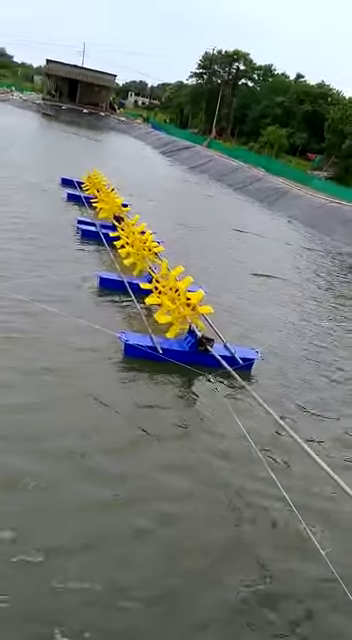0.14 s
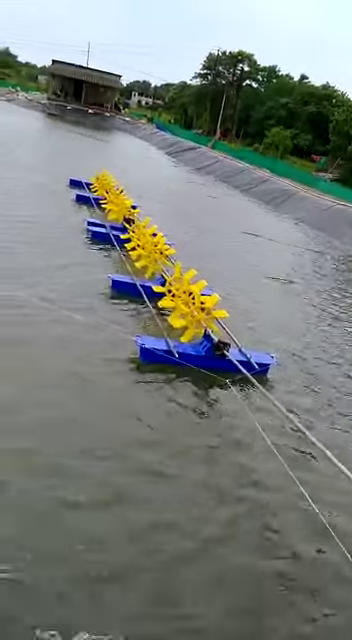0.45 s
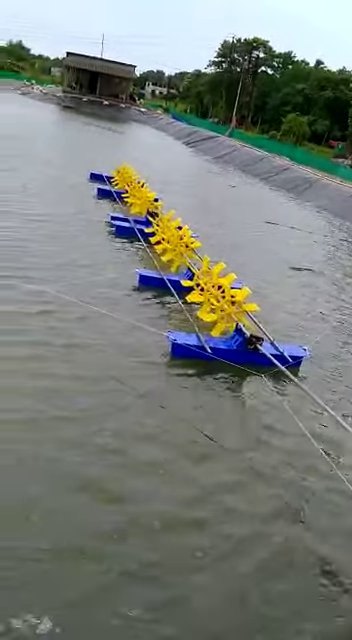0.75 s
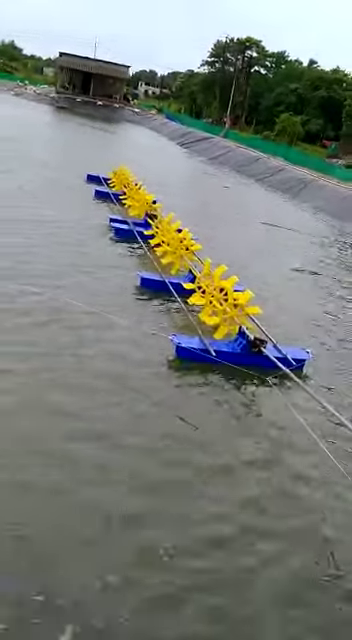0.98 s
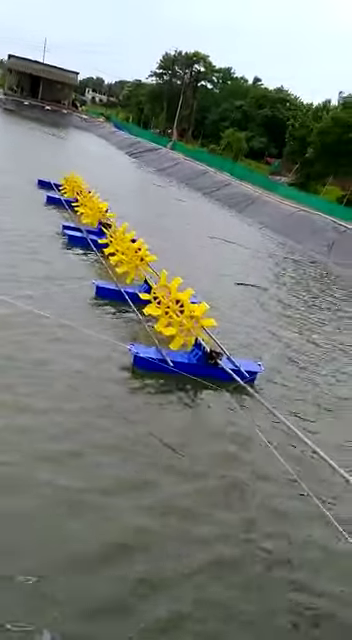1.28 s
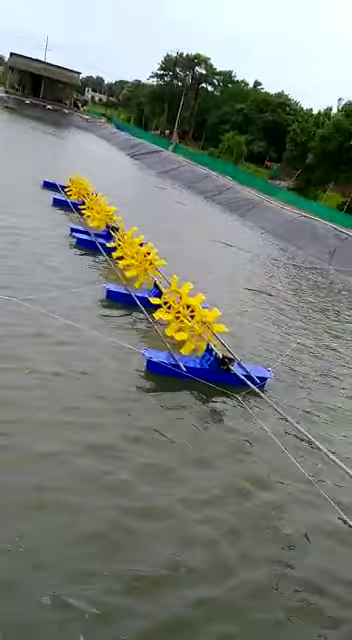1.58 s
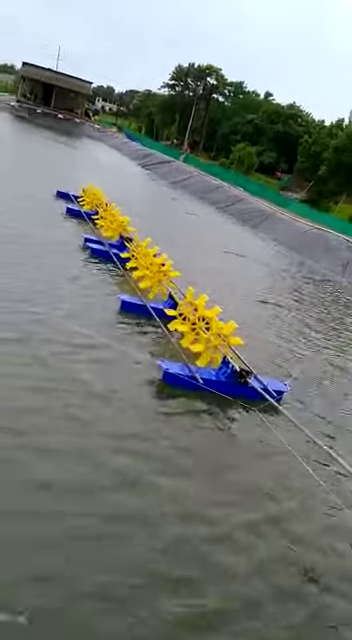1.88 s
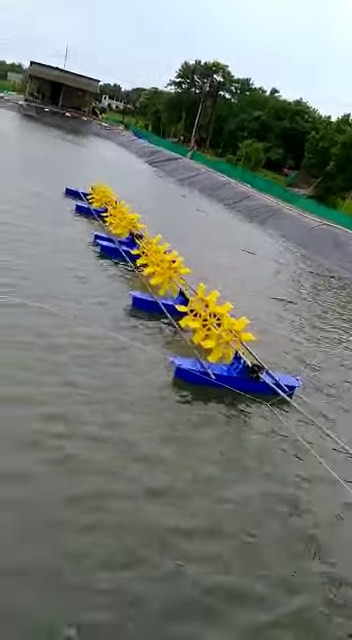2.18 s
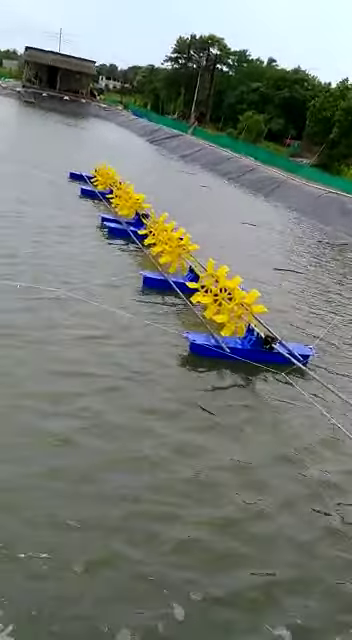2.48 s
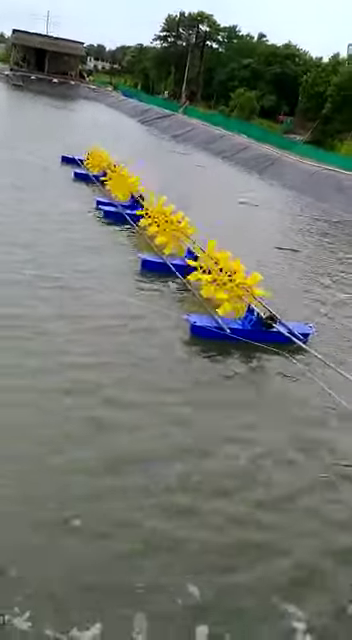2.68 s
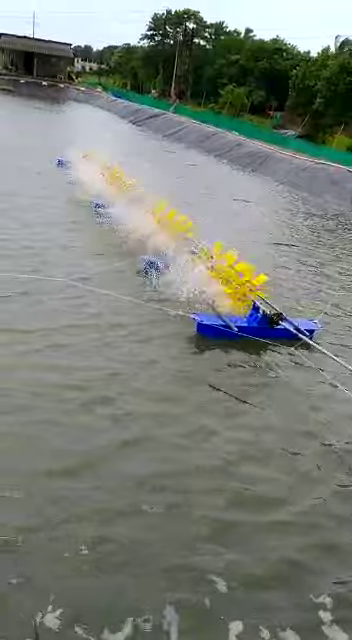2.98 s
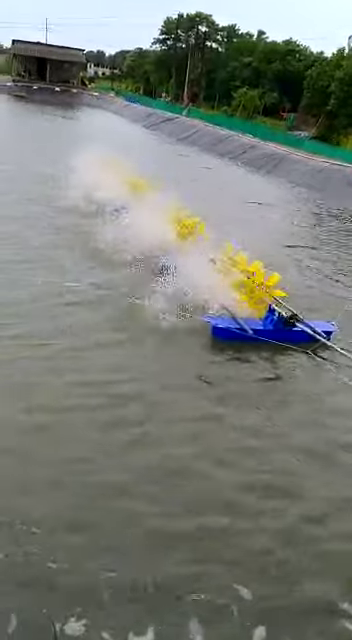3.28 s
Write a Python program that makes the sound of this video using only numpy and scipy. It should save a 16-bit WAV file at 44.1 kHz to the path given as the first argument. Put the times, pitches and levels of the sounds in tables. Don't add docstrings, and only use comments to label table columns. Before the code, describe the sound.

A row of chain-driven paddlewheels starts on an outdoor pond. From 0 to 2.6 seconds, faint rapid idle knocks, soft water hiss and tiny drips sit beneath uneven wind thumps; a thin falling bird whistle sounds at the start and near 1.6. Then irregular metallic chain strikes, ringing gear mesh and spray burst in, strongest around 2.8-3.0, easing as crackling wind slaps dominate from 3.05 to the end.

```python
import sys
import numpy as np
from scipy import signal
from scipy.io import wavfile
from scipy.ndimage import uniform_filter1d, minimum_filter1d

SR = 44100
rng = np.random.default_rng(int(sys.argv[2]) if len(sys.argv) > 2 else 0)


def materialize(psi):
    bounded = np.clip(np.atleast_2d(psi).T, -1, 1)
    quanta = np.round(bounded * 32767).astype(np.int16)
    wavfile.write(sys.argv[1], SR, quanta)


def convert_level_to_amplitude(level_db):
    exponent = np.asarray(level_db, float) / 20
    return 10 ** exponent


N = 152145
CLUTCH_S = 2.6


def rms_one(x):
    return x / np.sqrt(np.mean(x ** 2) + 1e-20)


def in_time(rows):
    return np.interp(np.arange(N) / SR, *np.transpose(rows))


def at_hz(points, hz):
    table_hz, value = np.transpose(points)
    return np.interp(np.log(hz), np.log(table_hz), value)


def drift(rate_hz):
    r = np.exp(-40 * np.pi * rate_hz / SR)
    noise = rng.standard_normal(N // 20 + 2002)
    slow = signal.lfilter([1], [1, -2 * r, r * r], noise)[2000:]
    return np.interp(np.arange(N) / 20, np.arange(len(slow)), rms_one(slow))


def clicks(s, gain):
    out = np.full(N, 1e-18)
    i = (np.asarray(s) * SR).astype(int)
    np.add.at(out, i[i < N], np.asarray(gain)[i < N])
    return out


def random_clicks(shape, per_s, spread_db, most):
    hit = rng.random(shape) < per_s / SR
    return hit * convert_level_to_amplitude(spread_db * np.minimum(rng.exponential(1, shape), most))


def fade(x, t60_s):
    return signal.lfilter([1], [1, -convert_level_to_amplitude(-60 / (t60_s * SR))], x)


def ring(x, hz, t60_s):
    r, w = convert_level_to_amplitude(-60 / (t60_s * SR)), 2 * np.pi * hz / SR
    return signal.lfilter([0, np.sin(w)], [1, -2 * r * np.cos(w), r * r], x)


def bandpass(x, low_hz, high_hz):
    return signal.sosfilt(signal.butter(2, [low_hz, high_hz], "band", fs=SR, output="sos"), x)


def bands(sources, low_hz, high_hz, count, gain_db):
    edges, out = np.geomspace(low_hz, high_hz, count + 1), 0
    for k in range(count):
        centre_hz = np.sqrt(edges[k] * edges[k + 1])
        gain = convert_level_to_amplitude(gain_db(centre_hz))
        out = out + gain * bandpass(sources[k % len(sources)], edges[k], edges[k + 1])
    return out


# (frequency [Hz], level [dB per Hz])
POND_COLOUR = [(600, 0), (1900, 1.5), (2700, -3), (3600, -14.5), (4800, -14.5), (7800, -14), (10800, -19.5),
               (15500, -14.5)]
# (time [s], level [dB])
LAPPING_SWELL = [(0, 0.5), (0.599, -4.5), (.75, 2.5), (.88, -1.5), (1.099, -3.5), (1.481, 3), (1.521, -3.5),
                 (2.238, -3.5), (2.289, 12.5), (2.35, -1.5), (2.6, 2)]
# (time [s], peak [dB], pitch [Hz])
DRIP_EVENTS = [(0.383, -51.5, 6040), (.55, -70, 6240), (0.8899, -54, 7800), (1.1578, -46, 8200),
               (1.292, -47, 7650), (1.3443, -48, 6750), (1.3798, -55, 6080), (1.4735, -53, 6500),
               (1.698, -39, 15400), (1.8826, -52, 5280), (1.888, -50, 14800), (1.9335, -51, 5840),
               (1.936, -47, 14000), (1.961, -39, 15100), (1.96, -48, 5560), (2.2149, -50, 7700),
               (2.2757, -44, 15400), (2.3343, -43, 5550), (2.5052, -54, 8010), (2.5346, -45, 13900)]


def pond():
    swell = in_time(LAPPING_SWELL) - np.mean(np.transpose(LAPPING_SWELL)[1])
    patches = 2 * np.tanh(drift(31.0) / 2)

    def gain_db(hz):
        lapping = swell * np.clip(hz / 5000, 0, 1)
        return at_hz(POND_COLOUR, hz) + lapping + 2.6 * patches + 0.5 * drift(27.0)

    hiss = bands(rng.standard_normal((2, N)), 478, 17300, 20, gain_db)
    drips = sum(ring(clicks([s], [convert_level_to_amplitude(db)]), hz, t60_s=0.0072) for s, db, hz in DRIP_EVENTS)
    return convert_level_to_amplitude(-56.5) * rms_one(hiss) + drips


# (start [s], length [s], level [dB])
BIRD_CALLS = [
    (-.03, 0.2, -59),
    (1.575, 0.19, -57.5),
]


def bird():
    out = 0
    for start_s, length_s, db in BIRD_CALLS:
        u = np.clip((np.arange(N) / SR - start_s) / length_s, 0, 1)
        hz = 2150 - 330 * u ** 2.2 + 40 * drift(53.0)
        breath = 1 + 0.4 * drift(120.0)
        envelope = np.sqrt(np.sin(np.pi * u) + 1e-9) * (u > 0) * (u < 1)
        out = out + convert_level_to_amplitude(db + 2.5) * breath * envelope * np.sin(2 * np.pi * np.cumsum(hz) / SR)
    return out


# (frequency [Hz], level [dB], t60 [s])
IDLE_MODES = [(1180, 1, 0.012), (1490, 6.5, 0.0078), (2050, 0.5, 0.014), (2500, -34.5, .012)]
# (time [s], level [dB])
KNOCK_CARRY = [(0, -14.5), (1.5, -0.5), (1.65, 4), (1.93, -1.5), (2.0, -5.5), (3.45, -5)]


def idle():
    first_s, period_s, level_db, weak_db = 0.087, 0.0912, -45, -19
    k = np.arange(56)
    weak = k % 2
    s = first_s + period_s * (k / 2 - 0.04 * weak)
    carry_db = np.interp(s, *np.transpose(KNOCK_CARRY))
    knock_db = level_db + weak_db * weak + carry_db
    knocks = 0
    for hz, db, t60_s in IDLE_MODES:
        chance_db = rng.normal(0, 3, len(k))
        knocks = knocks + ring(clicks(s, convert_level_to_amplitude(knock_db + db + chance_db)), hz, t60_s)
    return signal.sosfilt(signal.butter(4, 3000, fs=SR, output="sos"), knocks)


# (time [s], level [dB])
GUST_STRENGTH = [(0, -12), (.09, -25), (0.199, -18), (1.199, -18), (1.301, -47), (1.5, -17.5),
                 (1.622, -43.5), (1.898, -34.5), (1.992, -56.5), (2.06, -25), (2.13, -22), (2.18, -62),
                 (2.359, -23), (2.499, -9.5), (2.689, -18), (2.768, -39.5), (2.868, -21), (3.45, -17)]
# (time [s], tilt [dB per octave])
PORT_FACING = [(0, -2), (.6, 1), (.9, 1.5), (1.3, -1), (1.8, 1), (2.1, 0.5), (2.4, 0), (2.75, 1), (3.05, 0),
               (3.15, 5.5), (3.45, 4.5)]
# (time [s], peak [dB], crack [dB])
PORT_SLAPS = [(0.029, -20, -58), (0.064, -26.5, -67), (0.173, -24, -55), (0.193, -12.5, -45),
              (0.241, -10, -52), (0.281, -23, -52), (0.318, -16, -61), (0.374, -29.5, -59),
              (0.398, -29, -48), (0.42, -17, -48), (0.486, -7.5, -40), (0.511, -24.5, -49.5),
              (0.599, -21, -50), (0.66, -18.5, -51), (0.693, -11.5, -44), (0.729, -17, -46.5),
              (0.759, -11, -38), (0.809, -11, -47), (0.842, -8, -48), (0.865, -6.5, -31), (0.892, -17, -42),
              (0.913, -23, -55), (0.981, -15.5, -43), (1.021, -17, -53), (1.062, -25.5, -52),
              (1.088, -22, -51), (1.18, -9.5, -54), (1.385, -23, -62), (1.41, -26.5, -52),
              (1.463, -17.5, -48), (1.505, -13.5, -43), (2.058, -28.5, -74), (2.074, -25, -68),
              (2.101, -18, -47), (2.124, -17, -55), (2.359, -31, -58), (2.388, -22, -48.5),
              (2.436, -20, -57), (2.492, -21.5, -57), (2.554, -23.5, -58), (2.602, -15, -59),
              (2.628, -11.5, -52), (2.679, -20, -50), (2.852, -28.5, -34), (2.948, -18.5, -47),
              (3.017, -9.5, -45), (3.059, -5.5, -33), (3.072, -19, -71), (3.11, -15.5, -41),
              (3.131, -6.5, -39), (3.151, -16, -37), (3.178, -5.5, -36), (3.215, -13.5, -23),
              (3.237, -18.5, -25.5), (3.311, -13, -32), (3.344, -13, -32), (3.373, -12, -34),
              (3.399, -14, -26), (3.424, -9.5, -48)]


def wind_swing():
    rise_s, fall_s, slap_db = 0.008, 0.0092, 11
    s, db, _ = np.transpose(PORT_SLAPS)
    gust_excess = 0.5 * (np.interp(s, *np.transpose(GUST_STRENGTH)) + 19)
    over = db - np.mean(db) - gust_excess
    strength = np.clip(1 + 0.88 * over / slap_db, 0, 3)
    fall = fade(clicks(s, strength), fall_s * np.log(1000))
    slap = uniform_filter1d(fall, size=int(rise_s * SR), origin=int(rise_s * SR / 4))
    gust = in_time(GUST_STRENGTH) - np.max(np.transpose(GUST_STRENGTH)[1])
    lumps, flutter = 0.5 * drift(60.0), 4 * drift(83.0)
    return gust, in_time(PORT_FACING), slap_db * slap + lumps + flutter


# (frequency [Hz], level [dB per Hz])
WIND_COLOUR = [(12, -36), (20, 5.5), (147, 3), (173, 2.5), (354, -5), (947, -19.5), (1030, -29.5),
               (2590, -54), (3000, -17.5), (3900, -48), (6600, -120)]
# (frequency [Hz], share [dB per dB])
GUST_SHARE = [(25, 0.16), (100, 0.4), (300, 0.62), (1000, 1.31), (3000, 5.2)]
# (frequency [Hz], share [dB per dB])
FLICKER_SHARE = [(25, 0.018), (100, 0.66), (300, 0.46), (1000, 0.93), (3000, 0.82)]


def turbulence(gust, tilt, fast):
    def gain_db(hz):
        swing = at_hz(GUST_SHARE, hz) * gust + at_hz(FLICKER_SHARE, hz) * fast
        tilted = tilt * np.clip(np.log2(hz / 200), -2, 2.5)
        return at_hz(WIND_COLOUR, hz) + swing + tilted + 1.6 * drift(18.0)

    return convert_level_to_amplitude(-19) * rms_one(bands(rng.standard_normal((2, N)), 18.28, 3080, 16, gain_db))


def eddy_thuds(gust, tilt, fast):
    centre_hz = 501
    born = random_clicks(N, per_s=180, spread_db=9.8, most=3)
    thuds = bandpass(born + 1e-18, centre_hz * 0.63, centre_hz * 1.247)
    return convert_level_to_amplitude(-34.5 + 0.85 * gust + 1.65 * tilt + 0.25 * fast) * rms_one(thuds)


def slap_pops():
    s, db, _ = np.transpose(PORT_SLAPS)
    later_s = np.cumsum(rng.uniform(0.003, 0.007, (len(s), 3)), axis=1) - 0.004
    pop_db = db[:, None] + 1.5 - 3.3 * np.arange(3)
    burst = clicks((s[:, None] + later_s).ravel(), convert_level_to_amplitude(pop_db).ravel())
    puffs = fade(burst, 0.008) * (1 + 0.44 * drift(780.0))
    return bandpass(puffs, 250, 1110)


def slap_cracks():
    s, _, crack_db = np.transpose(PORT_SLAPS)
    snaps = fade(clicks(s + 0.0014, convert_level_to_amplitude(crack_db + 24)), 0.0015)
    return bandpass(snaps * (1 + 0.25 * rng.standard_normal(N)), 700, 4000)


def wind():
    swing = wind_swing()
    x = turbulence(*swing)
    cracks = slap_cracks()
    pressure = x + x * x + slap_pops() + eddy_thuds(*swing)
    lean = signal.lfilter([1, -1], [1, -np.exp(-2 * np.pi * 8.0 / SR)], pressure)
    port = signal.butter(4, 2330, fs=SR, output="sos")
    return signal.sosfilt(port, lean + cracks) + 0.034 * cracks


# (time [s], level [dB])
SPRAY_LEVEL = [(2.6, -53), (2.63, -57.5), (2.8, -54.5), (3.0, -56), (3.2, -58), (3.45, -56.5)]
# (frequency [Hz], level [dB per Hz])
SPRAY_COLOUR = [(900, 0.5), (1400, 4.5), (2600, -11), (4000, -11), (5000, -23), (6000, -18), (11000, -29),
                (15900, -46)]


def spray():
    drops = random_clicks((2, N), per_s=2500, spread_db=4.6, most=4) * rng.choice([-1, 1], (2, N))
    drops = drops * (np.arange(N) > CLUTCH_S * SR)
    patter = bands(drops + 1e-18, 1063, 16100, 20, lambda hz: at_hz(SPRAY_COLOUR, hz) + 1.1 * drift(10.0))
    return convert_level_to_amplitude(in_time(SPRAY_LEVEL) + 9) * rms_one(patter)


# (time [s], peak [dB])
CHAIN_TEETH = [(2.6043, -47), (2.6218, -31), (2.6402, -30), (2.6692, -22), (2.6851, -19), (2.7181, -31),
               (2.7505, -28), (2.7954, -18), (2.8089, -18.5), (2.8258, -18), (2.8398, -18), (2.8543, -14),
               (2.8702, -21.5), (2.8842, -14), (2.9141, -17.5), (2.9276, -16), (2.9555, -12.5),
               (2.9705, -16), (2.9999, -18.5), (3.0403, -25), (3.0533, -23.5), (3.0822, -29), (3.1097, -26),
               (3.1256, -19.5), (3.1531, -29.5), (3.168, -26.5), (3.1965, -39), (3.2109, -36),
               (3.2249, -44.5), (3.2553, -40), (3.2693, -42), (3.2833, -33), (3.2982, -21), (3.3267, -34),
               (3.3421, -38), (3.3561, -32), (3.3711, -29), (3.386, -28.5), (3.414, -30),
               (2.703, -26.5), (2.7319, -23.5), (2.7644, -21.5), (2.7795, -25.5), (2.8974, -18),
                (2.9404, -20), (2.9855, -18), (3.0144, -29), (3.0258, -36), (3.0666, -29), (3.095, -28),
                (3.1403, -33), (3.1814, -34.5), (3.2394, -33), (3.3114, -37), (3.3986, -24.5),
                (3.4296, -31), (3.4429, -27)]
# (frequency [Hz], level [dB])
HOUSING_MODES = [(1507, -6.5), (1584, 6.5), (1650, 8), (1730, 10.5), (1900, 8.5), (2085, 7.5), (2320, 5.5),
                 (2595, 6), (2950, -48)]
# (time [s], level [dB])
GEAR_LOAD = [(2.597, -91), (2.603, -34), (2.71, -38.5), (2.73, -37), (2.79, -36.5), (2.83, -29),
             (3.01, -34), (3.05, -40), (3.45, -39)]
# (time [s], level [dB])
LOW_SHELL = [(2.6, -20), (2.715, -24), (2.73, 1), (3.01, -2.5), (3.04, -13), (3.45, 2.5)]


def housing(tooth_s):
    beat = 1 + 1.66 * fade(clicks(tooth_s, np.ones(len(tooth_s))), 0.012)
    mesh = random_clicks(N, per_s=2500, spread_db=3.0, most=3) * rng.choice([-1, 1], N) * beat
    low_shell_db = in_time(LOW_SHELL)
    body = 0
    for hz, db in HOUSING_MODES:
        mode_db = db + 7.5 * np.tanh(drift(23)) + low_shell_db * (hz < 1800)
        body = body + convert_level_to_amplitude(mode_db) * ring(mesh + 1e-18, hz, t60_s=0.035)
    body = rms_one(body[int(CLUTCH_S * SR):])
    body = signal.sosfilt(signal.butter(3, 1300, "high", fs=SR, output="sos"), body)
    return convert_level_to_amplitude(in_time(GEAR_LOAD)) * np.concatenate([np.zeros(N - len(body)), body])


# (frequency [Hz], level [dB per Hz])
RATTLE_COLOUR = [(1760, -35), (3000, -17), (4500, -24), (5860, -9.5), (7230, -18.5), (8310, -9),
                 (10500, -17), (13500, -9.5), (15900, -3.5)]
# (frequency [Hz], level [dB])
LINK_MODES = [(4000, -23), (5950, -28), (8200, -17.5), (8800, -15), (12600, -8.5), (13550, -5.5),
              (14500, -14), (15300, -9.5)]


def chain(hits):
    shape = fade(hits, 0.012) + convert_level_to_amplitude(-9) * fade(hits, 0.092)
    rattle = bands(shape * rng.standard_normal((2, N)), 2620, 16250, 18,
                   lambda hz: at_hz(RATTLE_COLOUR, hz) + 2.35 * drift(30.0))
    touch = fade(hits, 0.0018) * rng.choice([-1, 1], N)
    links = sum(ring(touch * convert_level_to_amplitude(db - 16 + 3.4 * drift(44.0)), hz, t60_s=0.015) for hz, db in LINK_MODES)
    return rattle + links


def drive():
    s, peak_db = np.transpose(np.array(CHAIN_TEETH))
    return chain(clicks(s, convert_level_to_amplitude(peak_db + 1))) + housing(s)


def scene():
    return (pond() + bird() + idle() + wind() + spray() + drive())[None]


def top_cut(x):
    return signal.sosfilt(signal.butter(12, 16510, fs=SR, output="sos"), x)


def record(dry):
    limit, window = 0.5, 61
    dry = dry - 0.29 * signal.lfilter(*signal.iirpeak(5030, 5.0, fs=SR), dry)
    need = minimum_filter1d(np.minimum(1, limit / (np.abs(dry) + 1e-9)), size=window, axis=1)
    held = dry * uniform_filter1d(need, size=window, axis=1)
    mix = signal.sosfilt(signal.cheby2(14, 45, 16000, fs=SR, output="sos"), held)
    return top_cut(mix)


dry = scene()
out = record(dry)
materialize(out)
```